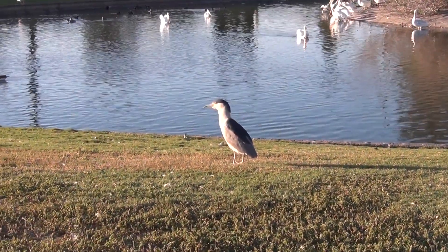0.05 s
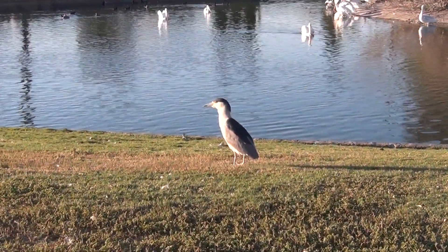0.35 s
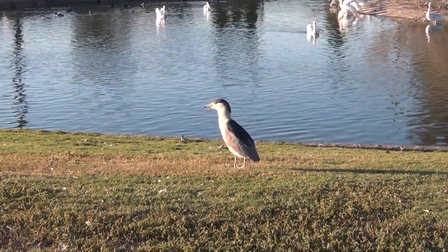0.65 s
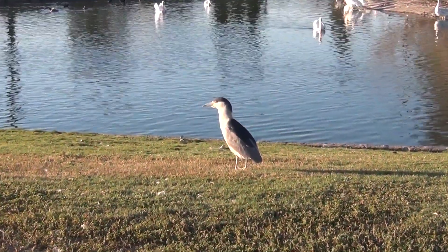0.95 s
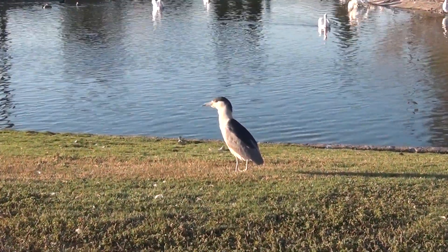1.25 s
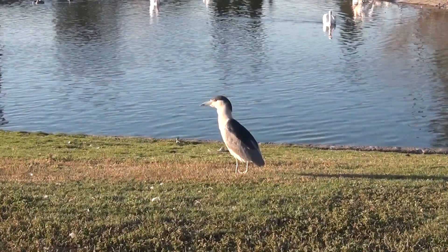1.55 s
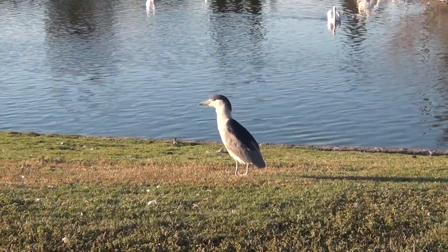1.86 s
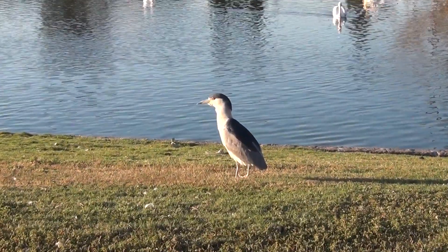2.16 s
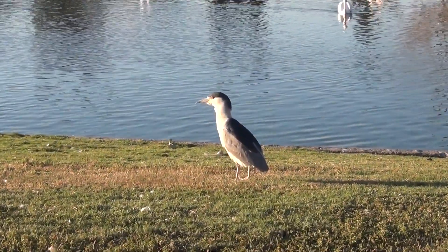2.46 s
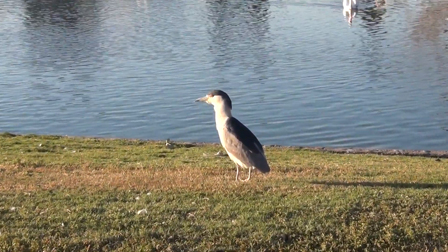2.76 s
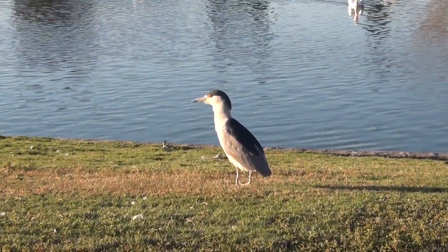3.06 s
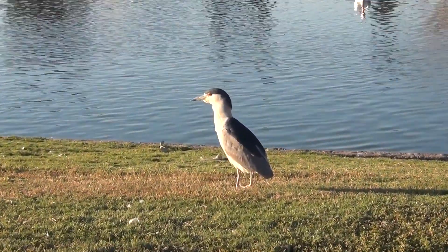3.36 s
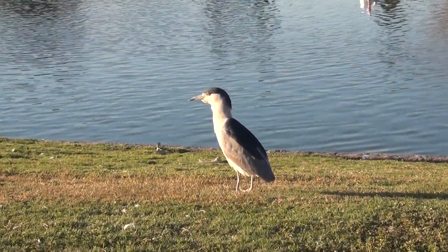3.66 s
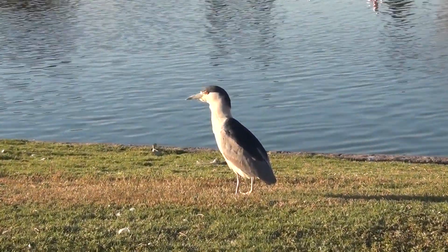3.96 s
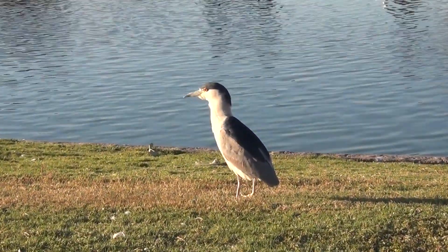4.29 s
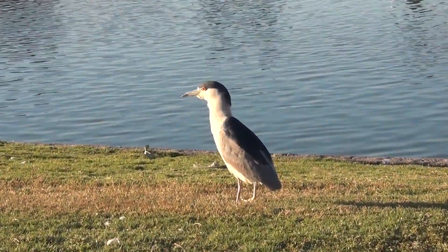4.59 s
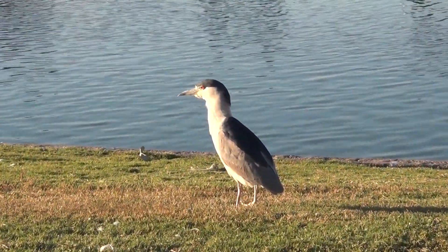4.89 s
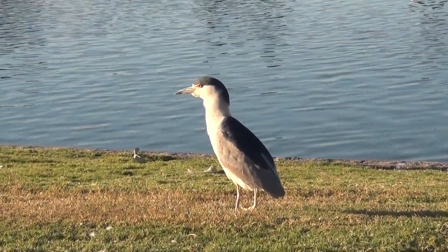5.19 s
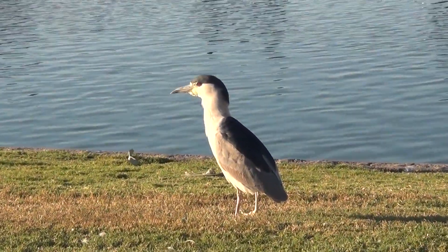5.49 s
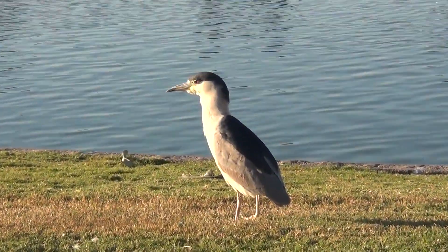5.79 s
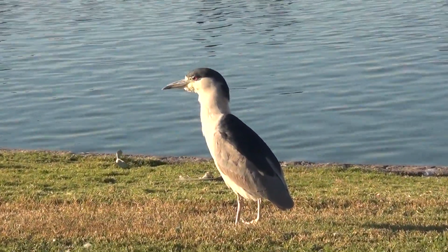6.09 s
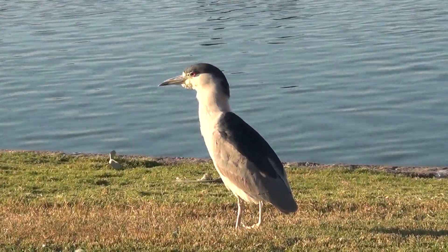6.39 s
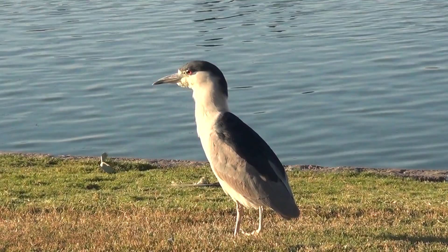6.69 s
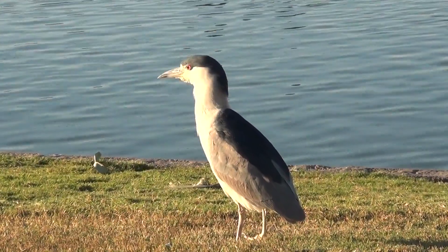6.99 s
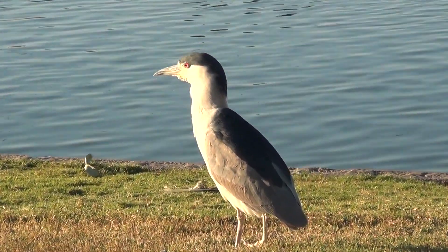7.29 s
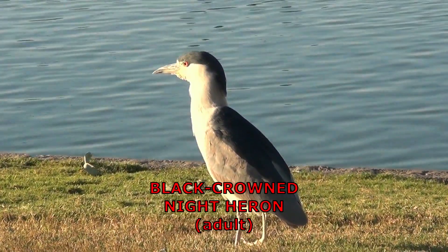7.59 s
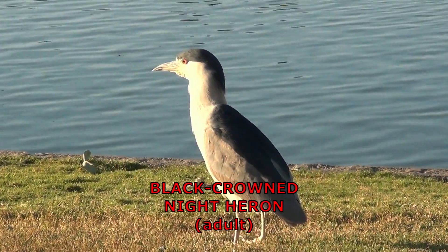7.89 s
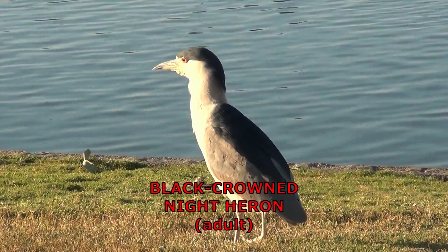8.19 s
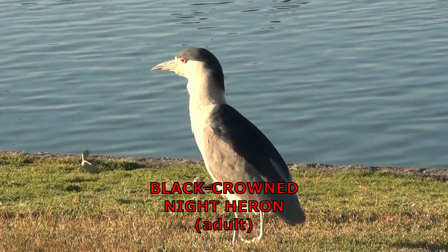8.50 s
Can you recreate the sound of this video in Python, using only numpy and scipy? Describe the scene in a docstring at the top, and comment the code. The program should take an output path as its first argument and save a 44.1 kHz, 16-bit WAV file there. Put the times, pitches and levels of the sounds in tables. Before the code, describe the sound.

Croaky waterfowl honks echo across a pond while far birds yelp and grunt and distant vehicles pass.

```python
"""Coots on a park pond. From the start distant engines rumble and tyres roar, while far coots yelp and
grunt, grass rustles and a bird trills. After a second comes the first of six near honks: the syrinx
flaps in a slow croak, breaks into a clear tone and sags, and the shores echo it. Meanwhile vehicles
pass, a hiss surges, small birds chip and a thin whine falls. Later a breeze buffets the nearly mono
microphone, and a far bird's moan rises under the last honk."""
import sys
import numpy as np
from scipy import signal
from scipy.fft import rfft, irfft, next_fast_len
from scipy.io import wavfile
from scipy.ndimage import uniform_filter1d

SR = 44100
rng = np.random.default_rng(int(sys.argv[2]) if len(sys.argv) > 2 else 0)


def generate_wav(sig):
    """Save sig (samples, or channels by samples) to the path in sys.argv[1] as 16-bit PCM at SR."""
    pcm = np.round(np.clip(np.atleast_2d(sig).T, -1, 1) * 32767).astype(np.int16)
    wavfile.write(sys.argv[1], SR, pcm)


N = 381465
TIME = np.arange(N) / SR
AHEAD_PAN_DB, FAR_PAN_DB = .5, 1.3  # left minus right


def undb(db):
    """Amplitude grows tenfold every 20 dB."""
    return 10 ** (np.asarray(db) / 20)


def unit(x):
    """Normalisation to rms 1."""
    return x / np.sqrt(np.mean(x ** 2) + 1e-18)


def add(track, start, x):
    """Superposition: a sound joins a track at a start in seconds."""
    i = max(int(start * SR), 0)
    track[i:i + len(x)] += x[:max(N - i, 0)]


def cut(x, hz, kind="low"):
    """Second-order filtering: 12 dB per octave beyond the corner."""
    return signal.sosfilt(signal.butter(2, hz, kind, fs=SR, output="sos"), x)


def response(spectrum, hz):
    """Frequency response: gain between (Hz, dB) points on a logarithmic frequency axis."""
    points_hz, db = np.transpose(spectrum)
    return undb(np.interp(np.log(np.maximum(hz, 1)), np.log(points_hz), db))


def resonate(x, gain):
    """Minimum-phase filtering: a causal response with the given gain per frequency bin."""
    cepstrum = irfft(np.log(gain))
    cepstrum[1:len(x) // 2] *= 2
    cepstrum[len(x) // 2 + 1:] = 0
    return irfft(rfft(x) * np.exp(rfft(cepstrum)))


def noise(spectrum):
    """Spectral shaping colours white noise; rms 1."""
    size = next_fast_len(N)
    gain = response(spectrum, np.fft.rfftfreq(size, 1 / SR))
    return unit(irfft(rfft(rng.standard_normal(size)) * gain, size)[:N])


def drift(rate_hz, size=N):
    """Smoothing random steps gives a drift with a spread near 1."""
    step = int(SR / rate_hz)
    steps = np.repeat(rng.standard_normal(size // step + 1), step)
    return 1.3 * uniform_filter1d(uniform_filter1d(steps, step), step)[:size]


def band(hz, width_hz):
    """Modulating a carrier with slow noise gives a narrow band; rms 1."""
    slow = cut(rng.standard_normal((2, N)), width_hz / 2)
    phase = 2 * np.pi * np.cumsum(hz * np.ones(N)) / SR
    return unit(slow[0] * np.cos(phase) + slow[1] * np.sin(phase))


def sweep(start, end, start_hz, end_hz, fade_s=.24):
    """Linear glide: pitch and envelope of a note that fades in and out."""
    envelope = np.clip(np.minimum(TIME - start, end - TIME) / fade_s, 0, 1)
    return np.interp(TIME, [start, end], [start_hz, end_hz]), envelope


def glide(path, waver):
    """Random frequency modulation makes a sine tremble along a path of pitch and level."""
    times, pitches, levels = np.transpose(path)
    sounding = (TIME > times[0]) & (TIME < times[-1])
    level = undb(np.interp(TIME, times, levels) + .8 * drift(40))
    hz = np.interp(TIME, times, pitches) * (1 + waver * drift(200))
    return sounding * level * np.sqrt(2) * np.sin(2 * np.pi * np.cumsum(hz) / SR)


def place(x, pan_db):
    """Level difference: a close microphone pair tells directions apart only above the bass."""
    treble = signal.sosfiltfilt(signal.butter(1, 700, "high", fs=SR, output="sos"), x)
    side = treble * (undb(pan_db / 2) - 1)
    return np.array([x + side, x - side])


def distant(spectrum, level, flutter_db=.49, width_db=-23):
    """Moving air makes distant noise flutter; a wide source differs a little between the ears."""
    level = level * undb(flutter_db * drift(14))
    side = undb(width_db) * cut(level * noise(spectrum), 800, "high")
    return place(level * noise(spectrum), AHEAD_PAN_DB) + np.array([side, -side])


def banks(x, t60=.43, echo_s=.14, echo_db=-4, spread_s=.077):
    """Scattering by trees and banks leaves a dull tail, with a cluster of far-shore echoes."""
    t = np.arange(SR) / SR
    decay = undb(-60 * t / t60) * (1 - np.exp(-t / .0093))
    cluster = undb(echo_db) * np.exp(-((t - echo_s) / spread_s) ** 2)
    tail = unit((decay + cluster) * rng.standard_normal(SR)) / np.sqrt(SR)
    return cut(signal.fftconvolve(x, tail)[:N], 3500)


# Wind spectrum. Each row: frequency in Hz, level in dB.
WIND_SPECTRUM = [(12, -22), (25, -12), (45, 5), (70, 2), (150, -34)]

def breeze(start_s=3.7, rise_s=.4, db=-61.5):
    """Turbulence at the microphone makes a faint, deep buffeting."""
    return undb(db) * np.clip((TIME - start_s) / rise_s, 0, 1) * noise(WIND_SPECTRUM)


# Engine and tyre spectra. Each row: frequency in Hz, level in dB.
RUMBLE_SPECTRUM = [(20, -33), (35, -21), (52, -9), (70, -2.5), (90, 1), (140, 0), (185, 1), (245, -2.5),
                   (300, -9), (450, -21.5), (900, -37)]
ROAR_SPECTRUM = [(150, -24), (360, -10.5), (480, -3), (620, 0.5), (900, 1.5), (1300, -1.5), (1600, -3.5),
                 (2000, -9.5), (2400, -13), (2800, -12.5), (3600, -20.5), (5000, -26.5), (7500, -38.5),
                 (15000, -61)]
# Passing vehicles. Each row: closest moment in seconds, time for the roar to fall 3 dB in seconds
# (of either sign), rumble in dB, roar in dB.
VEHICLES = [(1.25, 1.32, -47, -36), (2.9, 0.5, -56.5, -47), (5, -0.47, -55, -43.5), (7.4, 1.5, -57, -43.5)]

def traffic(engine_reach=1.6):
    """Spherical spreading: pressure falls as 1/distance. Soft ground hollows out the low middle."""
    rumble, roar = undb(-48.5), undb(-42.5)  # steady traffic
    for closest, width, rumble_db, roar_db in VEHICLES:
        along = (TIME - closest) / width
        rumble = np.hypot(rumble, undb(rumble_db) / np.hypot(1, along / engine_reach))
        roar = np.hypot(roar, undb(roar_db) / np.hypot(1, along))
    return rumble * noise(RUMBLE_SPECTRUM) + distant(ROAR_SPECTRUM, roar)


# Engine notes. Each row: start and end in seconds, first and last pitch in Hz, level in dB,
# octave's relative level in dB.
ENGINE_NOTES = [(0, 2.03, 93.9, 87.8, -50, -3.5), (.1, 3.4, 244.5, 234, -53.5, -27),
                (.5, 3.4, 149.2, 143, -57, -18), (2.2, 3.3, 109.7, 110.6, -53, -21.5),
                (3, 4.2, 184.7, 179.8, -54.5, -30), (4.7, 6.3, 95.9, 135, -56.5, -5),
                (6.6, 8.2, 103.6, 145.5, -53.5, -2.5)]

def engine_hum(waver=.0109, uneven_db=2.5):
    """Periodic firing gives a note and its octave, which sink in passing or climb in pulling away."""
    out = np.zeros(N)
    for start, end, start_hz, end_hz, db, octave_db in ENGINE_NOTES:
        hz, envelope = sweep(start, end, start_hz, end_hz)
        phase = 2 * np.pi * np.cumsum(hz * (1 + waver * drift(20))) / SR
        level = np.sqrt(2) * envelope * undb(db + uneven_db * drift(6))
        out += level * (np.sin(phase) + undb(octave_db) * np.sin(2 * phase))
    return out


# Tread notes. Each row: start and end in seconds, first and last pitch in Hz, level in dB.
TREAD_NOTES = [(0.55, 1.9, 825, 760, -47), (0.399, 2, 690, 655, -48.5), (1.05, 1.9, 1285, 1100, -46)]

def tyre_drone():
    """Tread on the road radiates narrow bands of noise that sink as the tyres pass."""
    out = np.zeros(N)
    for start, end, start_hz, end_hz, db in TREAD_NOTES:
        hz, envelope = sweep(start, end, start_hz, end_hz)
        out += undb(db) * envelope * band(hz, width_hz=40)
    return out


# Spectra of a broad rush and a narrow hiss. Each row: frequency in Hz, level in dB.
RUSH_SPECTRUM = [(600, -33), (780, -15), (1000, -35), (1260, 8), (1480, -10), (1900, -5.5), (2250, -21),
                 (2600, -6.5), (3300, -12), (3700, -13.5), (4200, -10.5), (5050, -15.5), (5700, -22),
                 (7100, -22), (8300, -41)]
HISS_SPECTRUM = [(1500, -65), (2350, -11.5), (2800, 7.5), (3150, -1), (3600, -10), (4300, -27),
                 (4850, -5.5), (5500, -21), (6500, -22), (7700, -39), (8600, -19), (11000, -44)]
# Surges. Each row: peak time, rise and fall in seconds, rush in dB, hiss in dB.
SURGES = [(1.05, .6, 0.71, -39.5, -51.5), (1.78, 0.45, 0.83, -47.5, -44), (2.75, 0.47, 0.57, -46.5, -46),
          (3.63, 0.25, 0.41, -51.5, -49), (5.17, 0.34, 0.63, -50, -50.5), (6.9, 0.87, 0.76, -71, -75)]

def surging_hiss(whirr_db=1.8):
    """Incoherent addition: bell-shaped swells of distant noise sum in power."""
    rush, hiss = undb(-75), undb(-62)  # between the surges
    for peak, rise, fall, rush_db, hiss_db in SURGES:
        swell = np.exp(-((TIME - peak) / np.where(TIME < peak, rise, fall)) ** 2)
        rush = np.hypot(rush, undb(rush_db) * swell)
        hiss = np.hypot(hiss, undb(hiss_db) * swell)
    return distant(RUSH_SPECTRUM, rush) + distant(HISS_SPECTRUM, hiss * undb(whirr_db * drift(70)))


# Path of the whine. Each row: time in seconds, pitch in Hz, level in dB.
WHINE_PATH = [(1.3, 10100, -85), (1.55, 10080, -69), (1.95, 9780, -72), (2.25, 9540, -66), (2.5, 9350, -76),
              (3.05, 9200, -72)]

def whine():
    """Slight frequency modulation unsteadies a thin, falling tone."""
    return glide(WHINE_PATH, waver=.003)


# Spectrum of the grass. Each row: frequency in Hz, level in dB.
GRASS_SPECTRUM = [(1500, -7), (5000, 0.5), (7000, -4.5), (8300, -1.5), (10500, -6), (15000, -26)]
# Rustles. Each row: peak time in seconds, decay in seconds, level in dB.
RUSTLES = [(.14, 0.076, -58), (3.18, 0.2, -57.5), (3.39, 0.079, -61), (3.62, .08, -61), (5.13, 0.11, -59),
           (6.185, 0.043, -54), (6.503, 0.042, -50.5)]

def grass(attack_s=.012, crackle_db=3.5):
    """Random amplitude modulation makes decaying bursts of noise crackle."""
    level = sum(undb(db) * np.exp(-np.abs(TIME - peak) / np.where(TIME < peak, attack_s, decay))
                for peak, decay, db in RUSTLES)
    return level * noise(GRASS_SPECTRUM) * undb(crackle_db * drift(250))


# Chips. Each row: start and length in seconds, first and last pitch in Hz, level in dB.
CHIPS = [(1.412, 0.029, 6470, 5420, -52), (6.64, .025, 6500, 6000, -64), (7.128, 0.018, 6300, 5300, -62),
         (8.089, 0.043, 6960, 4400, -58), (8.361, 0.019, 5440, 6960, -61)]

def small_birds(buzz=.08):
    """Fast frequency modulation roughens short, high glides into a buzz."""
    out = np.zeros(N)
    for start, length, start_hz, end_hz, db in CHIPS:
        size = int(length * SR)
        hz = np.linspace(start_hz, end_hz, size) * (1 + buzz * drift(1200, size))
        chip = np.hanning(size) * np.sin(2 * np.pi * np.cumsum(hz) / SR)
        add(out, start, undb(db) * unit(chip))
    return out


# Path of the moan. Each row: time in seconds, pitch in Hz, level in dB.
MOAN_PATH = [(8.42, 925, -66), (8.47, 950, -40.5), (8.56, 1003, -39), (8.65, 1083, -41)]

def moan():
    """Pitch jitter roughens a far bird's rising tone."""
    return glide(MOAN_PATH, waver=.022)


# The trill's resonances. Each row: centre and width in Hz, relative level in dB, fade in dB per second.
TRILL_BANDS = [(1325, 98, -3, -5), (2270, 150, -11.5, 26), (2824, 130, -4.5, 51), (5050, 250, -21, 5)]

def trill(start_s=.47, length_s=.54, attack_s=.039, release_s=.06, rattle_hz=31):
    """Amplitude modulation cuts a far bird's rough note into pips; its upper resonances fade."""
    t = TIME - start_s
    held = np.clip(t, 0, length_s)
    envelope = np.clip(t / attack_s, 0, 1) * np.exp(-np.maximum(t - length_s, 0) / release_s)
    pips = 1 + .67 * np.cos(2 * np.pi * np.cumsum(rattle_hz * (1 + .21 * drift(25))) / SR)
    voice = sum(undb(db - fade * held) * band(hz, width) for hz, width, db, fade in TRILL_BANDS)
    call = undb(-39) * envelope * pips * voice
    return call + banks(undb(-3) * call)


# Shore echoes. Each row: delay in seconds, relative level in dB.
SHORES = [(.105, -0.5), (.165, -6)]

def shore_echoes(x, smear_s=.012, dull_hz=3460, size=4096):
    """Reflection from uneven shores returns delayed, blurred and dull copies."""
    echoes = np.zeros(N)
    for delay, db in SHORES:
        add(echoes, delay, undb(db) * x)
    scatter = np.exp(-np.arange(size) / SR / smear_s) * rng.standard_normal(size)
    all_pass = irfft(np.exp(1j * np.angle(rfft(scatter))))  # blurs time, keeps the colour
    return cut(signal.fftconvolve(echoes, all_pass)[:N], dull_hz)


CROAK_HZ = 168.6  # slow flapping of the syrinx

def syrinx_tone(t, age, flap, attack, rough, hold, fundamental_db, bloom_db=5, flare_db=4.5):
    """A harmonic series: its top comes last, flares as the pitch turns and gives out first."""
    phase = 8 * np.pi * flap  # four cycles a flap
    tension = attack ** .3 * np.exp(-.36 * age ** 8)
    flare = undb(flare_db * np.exp(-((t - hold) / .0092 - 1) ** 2))
    tone = undb(fundamental_db + bloom_db * age ** 2) * np.cos(phase)
    for k in range(2, 17):
        # the flapping chops high harmonics more deeply
        chop = 1 + np.minimum(.17 * k * rough, 1) * np.cos(2 * np.pi * (flap - .15))
        shimmer = undb(1.3 * drift(250, len(t)))
        tone += tension ** (k - 1) * (flare if k > 4 else 1) * chop * shimmer * np.cos(k * phase)
    return np.sqrt(2) * tone


def throat_ring(t, since_flap, croak, rasp, decay_s=.0027, db=10.5):
    """Damped resonance: each flap rings the throat, higher and louder as it opens toward the break."""
    opening = np.exp(np.minimum(t, 0) / .011)
    hz = np.interp(opening, [0, 1], [1080, 1197])
    drive = croak * (.47 + 2 * opening) + rasp
    ring = undb(db) * drive * np.exp(-since_flap / decay_s) * np.sin(2 * np.pi * hz * since_flap)
    return cut(ring, 600, "high")


# Responses of the throat, then of the beak to voice, croak and hard pulses when tuned to 4400 Hz.
# Each row: frequency in Hz, gain in dB.
THROAT_RESPONSE = [(250, -22), (500, -6.5), (720, -6), (1000, -8.5), (1300, 3), (1550, 0), (1900, -9),
                   (2330, -13), (3100, -23.5), (4200, -31), (7000, -40.5), (13000, -86)]
BEAK_RESPONSE = [(3200, -37), (3950, -15), (4700, -20.5), (5250, -15.5), (5900, -60), (8300, -68),
                 (10100, -31.5), (13000, -86)]
BUZZ_RESPONSE = [(2500, -46), (3500, -34), (4050, -13), (4900, -20.5), (5600, -18.5), (6300, -32),
                 (8000, -52), (15000, -85)]
CRACK_RESPONSE = [(2500, -59), (3700, -19), (4100, -11), (4500, -16.5), (5400, -23.5), (6500, -41),
                  (10000, -62), (15000, -84)]

def honk(lead, length, hz, hold, sag, croak_db, hoarse, beak_hz, beak_db,
         fundamental_db=-2, buzz_db=-3, rasp_db=-12, crack_db=8, upper_db=0):
    """Source and filter: slow syrinx pulses break into a tone, and throat and beak colour both."""
    size, knee_s, attack_s, fade_db = 16384, .006, .0034, 10.5
    t = np.arange(size) / SR - lead  # zero at the break
    age = np.clip(t / length, 0, 1.25)
    rough = np.exp(-np.maximum(t, 0) / hoarse)
    # the pitch rises briefly, holds, then drops as the air runs out
    rise = 1 - .033 * np.exp(-age / .085)
    falling_s = knee_s * np.logaddexp(0, (age * length - hold) / knee_s)
    jitter = 1 + (.0014 + .009 * rough) * drift(300, size)
    pitch = hz * rise * np.exp(-sag * falling_s) * jitter
    # from the break on, the flapping locks to every fourth cycle of the tone
    flap_hz = np.where(t < 0, CROAK_HZ * (1 + .02 * drift(200, size)), pitch / 4)
    flap = np.cumsum(flap_hz) / SR
    flap -= np.interp(0, t, flap)
    since_flap = flap % 1 / CROAK_HZ
    # pressure builds, then runs down
    attack = np.exp(np.minimum(t - .002, 0) / attack_s)
    pressure = attack * undb(-fade_db * age ** 1.5) * np.clip((1.25 - age) / .25, 0, 1)
    tone = pressure * syrinx_tone(t, age, flap, attack, rough, hold, fundamental_db)
    flap_starts = np.diff(np.floor(flap), append=np.floor(flap[-1]))
    pulses = 60 * flap_starts * undb(.6 * rng.standard_normal(size))
    croak = (t < -.002) * undb(croak_db + 2 * np.minimum(t, 0) / lead)
    bins_hz = np.fft.rfftfreq(size, 1 / SR)
    beak_bins = bins_hz * 4400 / beak_hz  # the beak's opening shifts its resonances
    upper_resonance = undb(upper_db * np.exp(-((bins_hz - 2680) / 310) ** 2))
    throat = response(THROAT_RESPONSE, bins_hz) * upper_resonance
    beak = undb(beak_db) * response(BEAK_RESPONSE, beak_bins)
    voice = resonate(tone + croak * pulses, np.hypot(throat, beak))
    rasp = undb(rasp_db) * (t >= 0) * rough * pressure
    ring = throat_ring(t, since_flap, croak, rasp)
    # each flap lets out a scratch of air; the first hard pulses crack in the beak
    scratch = pulses + undb(21) * np.exp(-since_flap / .0015) * rng.standard_normal(size)
    buzz = resonate(scratch * croak, response(BUZZ_RESPONSE, beak_bins))
    crack = resonate(scratch * rough * pressure, response(CRACK_RESPONSE, beak_bins))
    return voice + ring + undb(beak_db + buzz_db) * buzz + undb(beak_db + crack_db) * crack


def pond(calls, scatter_db):
    """Multipath propagation: each call arrives directly, scattered by the banks and as echoes."""
    direct, scattered, reflected = np.zeros((2, N)), np.zeros(N), np.zeros(N)
    for start, call, pan_db, echo_db in calls:
        for channel, sound in zip(direct, place(call, pan_db)):
            add(channel, start, sound)
        add(scattered, start, undb(scatter_db) * call)
        add(reflected, start, undb(echo_db) * call)
    return direct + banks(scattered) + shore_echoes(reflected)


# Grunts. Each row: break time, croak length and tone length in seconds, pitch in Hz, level in dB,
# beak tuning in Hz, beak gain in dB.
GRUNTS = [(.166, 0.048, 0.073, 425, -40.5, 2700, 5), (3.590, 0.026, 0.085, 476, -44, 4420, -4),
          (3.829, 0.034, 0.031, 475, -44.5, 4400, -14), (5.340, .01, 0.052, 620, -41.5, 4200, -18)]

def far_grunts(echo_db=-29):
    """Subharmonic modulation: flapping lasts through these low calls, so they rasp."""
    calls = []
    for break_s, lead, length, hz, db, beak_hz, beak_db in GRUNTS:
        call = honk(lead, length, hz, hold=.0294, sag=2.6, croak_db=-2, hoarse=.11,
                    beak_hz=beak_hz, beak_db=beak_db)
        calls.append((break_s - lead, undb(db) * call, FAR_PAN_DB, echo_db))
    return pond(calls, scatter_db=-19)


# Yelps. Each row: break time and tone length in seconds, pitch in Hz, level in dB.
YELPS = [(.095, .051, 865, -36.5), (1.335, 0.097, 715, -42), (1.685, 0.053, 897, -32),
         (2.614, 0.079, 900, -36.5), (3.04, 0.07, 1044, -37), (3.125, 0.06, 947, -37),
         (4.556, 0.054, 702, -40.5)]

def far_yelps(lead=.02, echo_db=-29):
    """Reverberation marks distance: these clear calls carry the most scattered sound."""
    calls = []
    for break_s, length, hz, db in YELPS:
        call = honk(lead, length, hz, hold=.0127, sag=1.96, croak_db=-11, hoarse=.0088,
                    beak_hz=4200, beak_db=-18)
        calls.append((break_s - lead, undb(db) * call, FAR_PAN_DB, echo_db))
    return pond(calls, scatter_db=-9)


# Near honks. Each row: break time, croak length and tone length in seconds, pitch in Hz, its hold in
# seconds, its sag as a share per second, level in dB, fundamental, croak and buzz gains in dB, hoarse
# time in seconds, rasp in dB, beak tuning in Hz, then beak, crack, upper throat, echo and pan in dB.
HONKS = [ (1.094, 0.03, 0.06, 782, 0.031, 3.1, -28.5, 1, -7.5, -2, 0.0094, -12, 4300, -1, 10.5, -2, -15, 0),
         (3.020, .052, 0.081, 773, .048, 4.8, -26, -1.5, -9, -2, 0.01, -12, 4480, 0.5, 5.5, -4, -12, .5),
         (5.053, 0.073, 0.045, 751, 0.0026, 3.7, -35, 3.5, -3.5, 2, .1, 1.5, 4350, -2, 10, 0, -10, -0.5),
         (6.867, 0.063, 0.081, 775, 0.044, 3.8, -30, 1.5, -8.5, -4, 0.0084, -8, 4300, 2, 5, -2, -15, .2),
         (7.839, .016, 0.063, 734, 0.0273, 3.1, -29.8, -3, -6.5, -5, 0.016, -6, 6400, -17, 1, 6, -26, 2.4),
         (8.634, 0.16, 0.052, 702, .04, 3, -31.5, 0, -10, 9, .06, -0.5, 5200, -15, 7, -1, -16, -3.5)]

def near_honks():
    """Direct sound dominates at close range, and the shores answer each honk."""
    calls = []
    for (break_s, lead, length, hz, hold, sag, db, fundamental_db, croak_db, buzz_db,
         hoarse, rasp_db, beak_hz, beak_db, crack_db, upper_db, echo_db, pan_db) in HONKS:
        call = honk(lead, length, hz, hold, sag, croak_db, hoarse, beak_hz, beak_db,
                    fundamental_db, buzz_db, rasp_db, crack_db, upper_db)
        calls.append((break_s - lead, undb(db) * call, pan_db, echo_db))
    return pond(calls, scatter_db=-16)


def scene():
    """Superposition of sources that lie ahead, most a touch to the left."""
    faint = small_birds() + grass() + trill() + whine() + moan()
    coots = near_honks() + far_yelps() + far_grunts()
    background = breeze() + traffic() + engine_hum() + tyre_drone() + surging_hiss()
    return background + place(faint, AHEAD_PAN_DB) + coots


def record(dry, hiss_db=-61, apart_db=-25, scan_hz=15734, scan_db=-72.5, top_hz=15800):
    """Self-noise and band limiting: a camcorder adds hiss and a line-scan whistle, and cuts the top."""
    hiss = rng.standard_normal(N) + undb(apart_db) * rng.standard_normal((2, N))
    whistle = undb(scan_db) * np.sqrt(2) * np.sin(2 * np.pi * scan_hz * TIME)
    low_pass = signal.ellip(10, .1, 70, top_hz, fs=SR, output="sos")
    return signal.sosfilt(low_pass, dry + undb(hiss_db) * hiss + whistle)


dry = scene()
out = record(dry)
generate_wav(out)
```